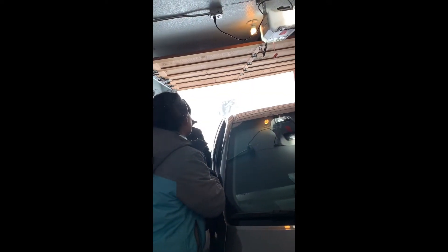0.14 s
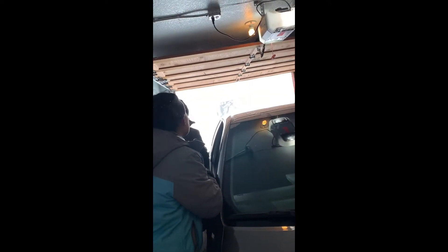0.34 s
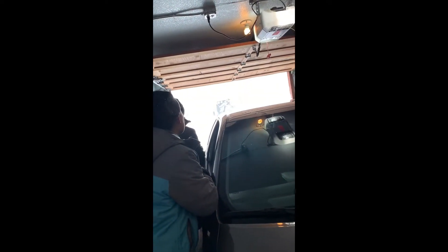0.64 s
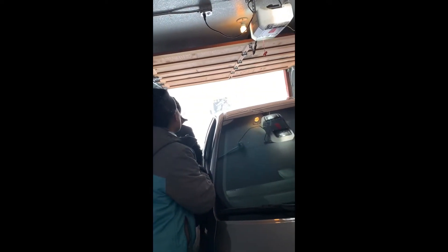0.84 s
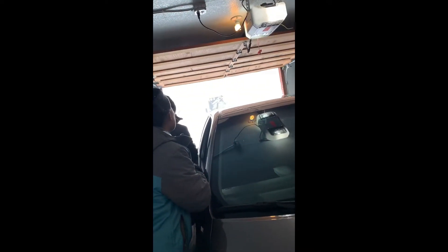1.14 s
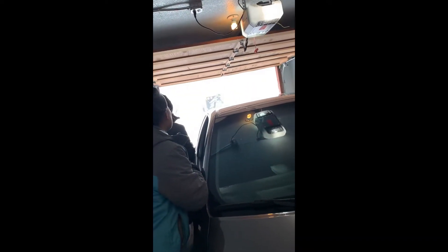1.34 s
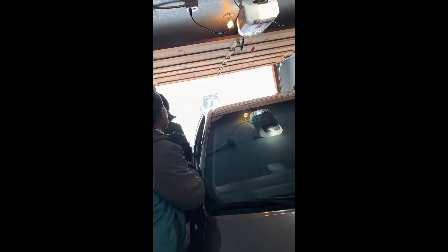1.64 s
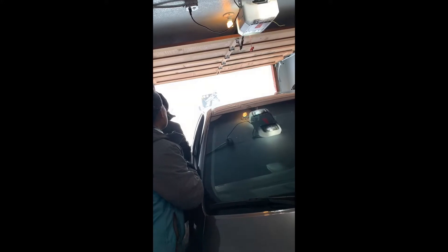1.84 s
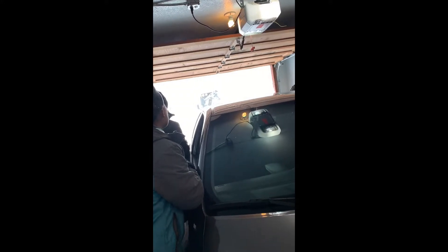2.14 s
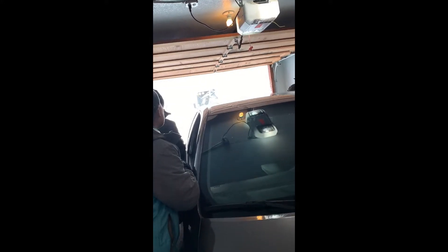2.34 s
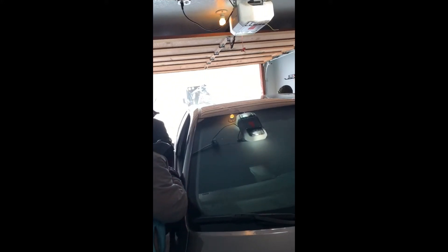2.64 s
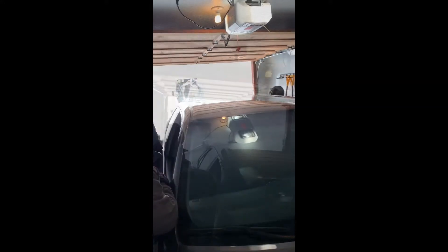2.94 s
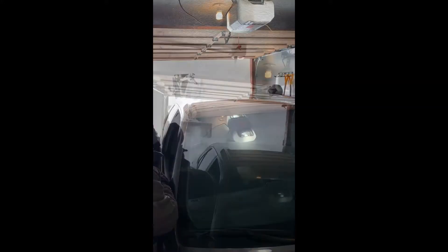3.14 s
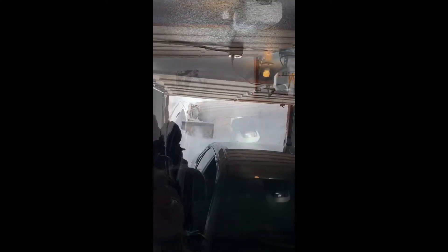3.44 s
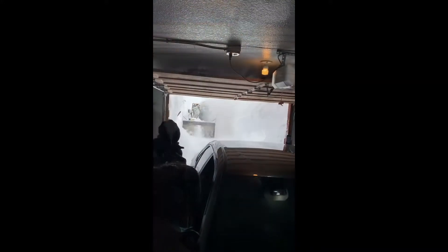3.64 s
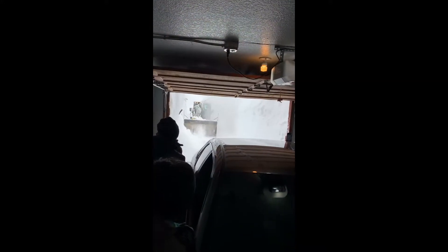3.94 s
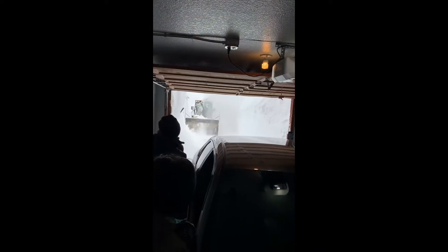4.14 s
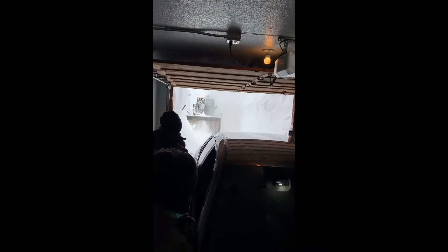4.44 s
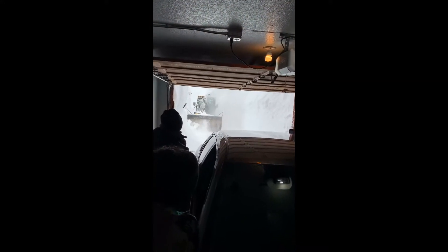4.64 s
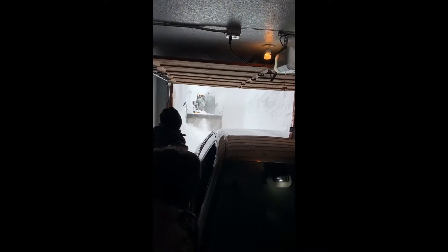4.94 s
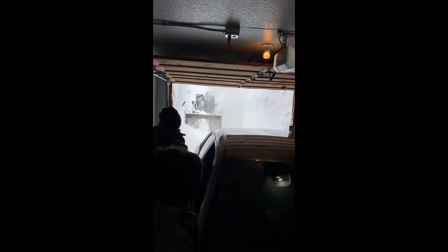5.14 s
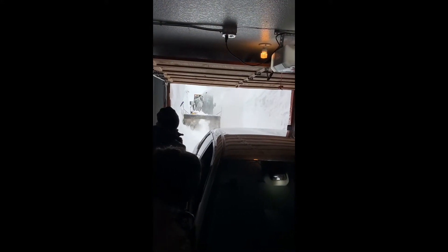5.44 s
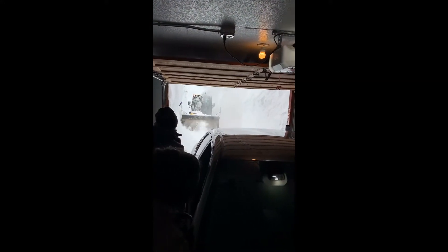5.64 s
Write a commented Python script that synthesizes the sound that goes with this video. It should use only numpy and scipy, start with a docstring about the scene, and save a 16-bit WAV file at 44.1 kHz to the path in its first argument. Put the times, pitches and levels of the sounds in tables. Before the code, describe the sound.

Inside a garage with its door open, a petrol snowblower works close outside. From 0 to 3 s it is loud and full: a low engine drone near 46 turns a second, throbbing about six times a second, with exhaust rumble, whining impeller, mechanical roar, gritty snow hiss and rattling steel. Engine pitch sags at about 0.3, 1.5 and 2.2 s, then recovers. Heavy low thumps come about every half second until 2.9 s. Thin steel squeals peak from 1.0 to 1.6 s; high chirps cluster from 2.3 to 3.2 s. A low boom grows over the first two seconds. Between 3 and 3.7 s the machine crossfades to a distant, duller, slightly higher-pitched drone. Small scuffs occur early; stronger thuds and clatters strike nearby at 4.05, 4.35, 4.65, 4.77 and 5.23 s. Low steel groans swell around 4.2, 4.8, 5.1 and 5.75 s as the drone continues to the end.

```python
"""A petrol snowblower works outside an open garage, heard from inside: first close, then, as the scene changes
around 3.2 s, from farther away. Its engine drones and throbs as a stack of tones locked to the crankshaft, and
the belt-driven impeller whines. Filtered noise makes the exhaust rumble, the mechanical roar, the hiss of snow
in the chute and the rattle of steel. The housing rings, squeals and chirps in its own modes, over a low boom
that fills the garage. A few scuffs and knocks in the garage are short bursts of grit and ringing."""
import sys
import numpy as np
from scipy import signal
from scipy.fft import rfft, irfft
from scipy.io import wavfile
from scipy.ndimage import uniform_filter1d

SR = 44100
rng = np.random.default_rng(int(sys.argv[2]) if len(sys.argv) > 2 else 0)


def put_to_file(sound):
    """Save the sound as 16-bit audio at rate SR, in the file named by the first command-line argument."""
    columns = np.atleast_2d(sound).T  # one column per channel
    safe = np.clip(columns, -1, 1)
    whole_steps = np.round(safe * 32767)
    wavfile.write(sys.argv[1], SR, whole_steps.astype(np.int16))


N = 255780
TIME, BINS = np.arange(N) / SR, np.fft.rfftfreq(N, 1 / SR)  # seconds, Hz

# How near the machine sounds. Each row: time in seconds, share of the close sound from 0 to 1.
CLOSENESS = [(0, 0.94), (2.95, 0.96), (3.2, 0.29), (3.45, 0.08), (3.7, 0), (5.8, 0.04)]
# How alike the two channels are. Each row: frequency in Hz, likeness from 0 to 1.
LIKENESS = [(60, 1), (300, 0.97), (650, 0.66), (900, 0.41), (1400, 0.97), (2000, 0.43), (2600, 0.36),
            (4000, 0.39), (5400, 1), (6300, 0.48), (8300, 1), (9600, 0.88), (11500, 1), (15000, 1)]
# How far the left channel leads the right. Each row: frequency in Hz, lead in radians.
LEFT_LEAD = [(0, 0), (1500, 0), (1950, .4), (2300, 2), (3300, 2.6), (4100, 1.3), (5000, 2.9), (5600, 3.3),
             (7700, 5.7), (9000, 6.5), (11000, 9.2), (12700, 9.6), (14000, 12), (16000, 12.6)]
# Standing waves in the garage lift or dip tones that slide across them.
# Each row: centre in Hz, width in Hz, gain at the centre in dB.
STANDING_WAVES = [(173.2, 12.7, 4.5), (228.4, 5, 7), (276.5, 7, 3), (325.3, 1.9, 3), (356.3, 5.3, 7),
                  (500.5, 3, 2), (755, 8.6, -0.5)]

# The speed that the governor holds. Each row: time in seconds, engine turns per second.
GOVERNED_SPEED = [(3.35, 46.42), (3.9, 48.5)]
# The auger bites into deep snow and drags the engine down.
# Each row: deepest moment in seconds, half length in seconds, sag in percent.
SNOW_BITES = [(.3, .19, 1.5), (1.46, .23, 4), (2.19, .21, 2.7), (3.03, .1, 1), (5.17, .15, .8)]
# After each bite the governor overshoots a little.
OVERSHOOT_PERCENT, OVERSHOOT_AFTER_S, OVERSHOOT_S = .6, .45, .14
HUNT_PERCENT, HUNT_HZ = .17, 5  # uneven firings make the speed hunt a little
TURNS_PER_THROB, FIRST_THROB_TURNS, THROB_DB = 8.13, 4.6, 2.3  # one throb in several engine turns
IMPELLER_PER_TURN, SLIP_PERCENT = .3997, .22  # the belt gears the impeller down and slips a little
# Snow passing through the machine. Each row: time in seconds, flow in dB.
SNOW_FLOW = [(0, -1), (.9, 0.1), (1.7, -0.76), (2.5, 2), (3.15, 1.04), (3.75, -2), (4.2, -1), (5.8, -0.6)]
ROAR_PER_FLOW, HISS_PER_FLOW = 0.93, 1.17  # dB per dB of flow
LABOUR_DB_PER_PERCENT = 0.03  # the exhaust rumbles harder as the engine sags

# Engine tones, before level changes and standing waves.
# Each row: multiple of the engine speed, close level in dB, far level in dB.
ENGINE_ORDERS = [(2, -26.5, -29.5), (3, -31.5, -54), (4, -28.3, -48), (5, -31, -41.5), (6, -29.8, -43),
                 (7, -38, -50), (8, -37.5, -42), (9, -46, -50), (16, -43, -51)]
# Level changes of the lowest order: it drops near 3 s and rises near the end.
# Each row: time in seconds, gain in dB.
LOWEST_ORDER_GAIN = [(0, -1.5), (.7, 0), (2.9, 0), (3.4, -2), (5.1, -2), (5.5, 4)]
# Level changes of the fifth order. Each row: time in seconds, gain in dB.
FIFTH_ORDER_GAIN = [(0, -14), (.8, -14), (1.25, 1), (1.85, -0.5), (2.3, 3), (2.8, -8), (3.2, -3)]
# Impeller tones, before snow flow and standing waves. Each row: multiple of the impeller speed (rounded
# to halves in use), close level in dB, far level in dB, roughness as a ratio, dB per dB of flow.
IMPELLER_LINES = [(4, -32.5, -62, 0.089, -1.5), (9, -37, -66, 0.07, 4), (12, -34, -38.5, 0.12, 2.5),
                  (16.5, -35.5, -45.5, 0.23, -2), (18, -36, -54, 0.3, -5), (19, -36.5, -63, 0.21, -4),
                  (27, -35.5, -41.5, 0.22, .8), (33.5, -44, -50, .25, 2.5), (40.5, -41, -50.5, 0.25, 0),
                  (47, -41, -54.5, .2, 1), (54, -49.5, -50, 0.44, 0), (71.7, -49.5, -58, 0.61, -1.5),
                  (79.1, -44.5, -53, 0.52, -2.5)]
# Exhaust noise, before trims. Each row: frequency in Hz, close level in dB per Hz, far level in dB per Hz.
EXHAUST_RUMBLE = [(15, -66, -72), (28.6, -48.5, -54), (43.3, -41.5, -38.5), (57.5, -43, -45),
                  (81.6, -38.5, -43), (103, -41, -44), (128, -45, -59), (161, -50, -55), (214, -51.5, -66),
                  (256, -53.5, -53), (300, -49, -53), (327, -48.5, -50), (405.4, -50.5, -56.5),
                  (410, -59.5, -59)]
# Mechanical roar and snow hiss, before trims.
# Each row: frequency in Hz, close level in dB per Hz, far level in dB per Hz.
ROAR_AND_HISS = [(425, -56.5, -61), (576, -61, -59), (654, -54, -55.5), (655, -57, -60), (720, -54.5, -61),
                 (800, -59, -57.5), (850, -58, -62.5), (1020, -63, -63.5), (1090, -65, -63),
                 (1210, -64.5, -65), (1650, -65, -68.5), (1790, -63.5, -66.5), (1900, -68.5, -68.5),
                 (2010, -67, -71.5), (3270, -71.5, -75), (4150, -70, -77), (4850, -70.5, -77.5),
                 (9100, -75, -80.5), (10400, -81, -81), (13600, -84, -91), (15500, -87, -95)]
# Loose steel that rattles. Each row: centre in Hz, half width in Hz, relative level in dB.
RATTLE_MODES = [(1280, 67, 2), (1500, 98, -3.5), (1604, 80, 3), (1990, 110, -12), (2500, 270, -4.5),
                (4080, 150, -18.5)]
RATTLE_DB, RATTLE_FAR_DB = -42.5, -53.5  # before snow flow
# Ringing of the steel housing and chute.
# Each row: centre in Hz, half width in Hz, close level in dB, far level in dB.
HOUSING_RINGS = [(102.8, 3.7, -34, -33), (329, 30, -38, -35.5), (1290, 53, -43.5, -44),
                 (1463, 52, -47, -49.5), (4200, 220, -74, -59), (5030, 73, -45, -70),
                 (6740, 31, -48.5, -75), (8330, 70, -49.5, -59.5), (10200, 140, -46, -74)]
# A low boom that fills the garage, before its level changes. Each row: frequency in Hz, level in dB.
GARAGE_DRONE = [(77.7, -23.8), (155.4, -38.5), (233.1, -37.5)]
# Level changes of the boom. Each row: time in seconds, gain in dB.
DRONE_GAIN = [(0, -15), (2.2, 0.5), (2.7, -2.5), (4.8, -1), (5.8, -1.5)]

# The auger rubs on the housing.
# Each row: middle in seconds, half length in seconds, mode in Hz, level at the middle in dB.
AUGER_RUBS = [(.4, .6, 6530, -47), (1.3, 1.8, 3640, -44), (.79, .1, 3640, -48), (.99, .06, 3640, -42),
              (1, .3, 3705, -44), (1.1, .12, 6767, -33.5), (1.11, .09, 3640, -34), (1.1, .06, 10143, -42),
              (1.13, .1, 8414, -39), (1.35, .13, 8250, -38), (1.36, .5, 6767, -43), (1.36, .13, 10143, -39),
              (1.49, .15, 3640, -34), (1.55, .35, 3705, -47), (1.74, .13, 3640, -45), (2, .3, 3640, -42.5),
              (2, .25, 3590, -44), (2.075, .045, 3640, -37), (2.15, .08, 6767, -43), (2.45, .3, 10143, -44),
              (.7, 1, 8414, -47), (2.5, .8, 8414, -46), (4.2, .12, 328, -30), (4.77, .22, 328, -27),
              (5.06, .15, 328, -31), (5.75, .3, 328, -31)]
# The modes in which the steel groans and squeals, in Hz.
STEEL_MODES_HZ = [328, 3590, 3640, 3705, 6530, 6767, 8250, 8414, 10143]
# Heavy thumps, about one for every three throbs. Each row: start in seconds, peak level in dB.
HEAVY_THUMPS = [(.238, -15), (.757, -15.5), (1.287, -20), (1.835, -20), (2.385, -16), (2.915, -18)]
# Low modes that a thump rings. Each row: frequency in Hz, relative level in dB.
THUMP_RINGING = [(58, -14.5), (84, -2)]
# Brief touches on the steel. Each row: start in seconds, lower mode in dB, upper mode in dB.
STEEL_CHIRPS = [(.262, -36, -40), (2.3, -41, -41), (2.35, -38, -39), (2.434, -45, -44), (2.461, -37, -34),
                (2.548, -47, -41), (2.66, -44, -46), (2.722, -41, -38), (2.785, -46, -50),
                (2.808, -33, -33.5), (3.022, -39, -35), (3.1, -51, -40), (3.25, -41, -43),
                (4.906, -37.5, -55), (4.934, -43, -55), (4.995, -39, -55), (5.015, -44, -52),
                (5.703, -48, -51), (5.765, -48, -49)]
# The two modes of a chirp. Each row: centre in Hz, half width in Hz.
CHIRP_RINGING = [(8350, 180), (10143, 44)]

# What a knock or scuff sets ringing, from low to high.
# Each row: centre in Hz, half width in Hz (unused in a knock's thud), relative level in dB.
THUD_MODES = [(208, 14, 3), (255, 20, -1), (300, 28, -7), (350, 47, -6)]
CLATTER_MODES = [(710, 330, 5.5), (1080, 29, -9), (1330, 130, 0.5), (1682, 25, 8), (2550, 1400, -6.5)]
SCRAPE_MODES = [(4400, 2000, -1.1), (8260, 1200, -1.8), (10400, 240, -1.2)]
# Rough contacts. Each row: start in seconds, length in seconds, thud in dB, clatter in dB, scrape in dB.
ROUGH_SCUFFS = [(0.784, 0.042, -19, -28, -35), (0.969, 0.034, -19, -30, -33),
                (2.052, 0.03, -27, -20.5, -47), (2.797, 0.014, -22, -26, -41), (4.029, 0.1, -22, -31, -43),
                (4.079, 0.11, -24, -33, -57), (4.36, 0.091, -31, -27.5, -38.5),
                (4.62, 0.023, -40, -26.5, -42), (4.755, 0.043, -27, -27.5, -38),
                (5.22, 0.085, -26, -50, -55)]
# Hard blows. Each row: start in seconds, thud in dB, clatter in dB, scrape in dB.
HARD_KNOCKS = [(4.027, -30, -36, -38), (4.058, -10.5, -30, -44), (4.073, -9.5, -33, -40),
               (4.321, -35, -31, -36), (4.366, -23, -26, -38), (4.38, -20, -26, -36), (4.54, -40, -44, -43),
               (4.629, -28, -26, -33.5), (4.654, -32, -30, -44), (4.684, -34, -31, -46),
               (4.757, -17, -22.5, -37), (4.77, -24, -26, -37), (4.814, -32, -40, -41),
               (5.235, -17, -36, -48)]


def amp(db):
    """Decibels to gain."""
    return 10 ** (np.asarray(db) / 20)


def evened(x):
    """Scales to rms 1."""
    return x / np.sqrt(np.mean(x ** 2) + 1e-20)


def curves(rows):
    """Each column of a table, joined by straight lines in time."""
    s, *columns = np.transpose(rows)
    return [np.interp(TIME, s, c) for c in columns]


def spectra(rows):
    """Each column of a table, joined by straight lines over log frequency."""
    hz, *columns = np.transpose(rows)
    return [np.interp(np.log(BINS + 1), np.log(hz + 1), c) for c in columns]


def wander(rate_hz):
    """Slow random drift of rms 1."""
    return evened(irfft(rfft(rng.standard_normal(N)) / (1 + (BINS / rate_hz) ** 2), N))


def below(edge_hz):
    """Gain of a steep low-pass."""
    return 1 / np.sqrt(1 + (BINS / edge_hz) ** 10)


def above(edge_hz):
    """Gain of the matching high-pass."""
    return np.sqrt(1 - below(edge_hz) ** 2)


def resonance(hz, half_width_hz):
    """Gain of a resonance, down to half at the half width on each side."""
    return 1 / (1 + ((BINS - hz) / half_width_hz) ** 2)


def noise():
    """Two unrelated white noises."""
    return rng.standard_normal((2, N))


def grit(per_s=900, spread_db=6.0, share=0.19):
    """Hiss mixed with separate random grains, like ice hitting the chute."""
    grain_db = spread_db * np.minimum(rng.exponential(1, N), 5)
    grains = amp(grain_db) * (rng.random(N) < per_s / SR)
    return evened(noise() + share * evened(grains * noise()))


def stereo(gain, pair):
    """Colours two unrelated signals and blends them into a left and a later, partly alike right channel."""
    a, b = rfft(pair) * gain
    same = np.clip(spectra(LIKENESS)[0], 0, 1)
    lag = np.exp(-1j * np.interp(BINS, *np.transpose(LEFT_LEAD)))
    right = lag * (same * a + np.sqrt(1 - same ** 2) * b)
    return irfft(np.array([a, right]), N)


def closeness():
    """Share of the close sound over time."""
    return np.clip(curves(CLOSENESS)[0], 0, 1)


def distance(close_db, far_db):
    """Gain that passes between its close and its far value."""
    close = closeness()
    return np.sqrt(close * amp(close_db) ** 2 + (1 - close) * amp(far_db) ** 2)


def wash(table, band, drive):
    """Noise with the close spectrum giving way to the far one."""
    close = closeness()
    near, far = (stereo(band * amp(db) * np.sqrt(SR / 2), drive()) for db in spectra(table))
    return np.sqrt(close) * near + np.sqrt(1 - close) * far


def tone(turns, rough, flutter_hz):
    """A tone of rms 1 from a random starting phase, whose strength and phase flutter."""
    flutter = 1 + rough * (wander(flutter_hz) + 1j * wander(flutter_hz))
    return evened((flutter * np.exp(2j * np.pi * (turns + rng.random()))).real)


def standing(turns):
    """Gain that the garage's standing waves give a tone as its pitch moves."""
    line_hz = np.gradient(turns) * SR
    return amp(sum(db / (1 + (2 * (line_hz - hz) / width_hz) ** 2) for hz, width_hz, db in STANDING_WAVES))


def patches(x, patchy_db=3.0, span_s=.11, span_hz=60):
    """The garage's echoes favour narrow bands that come and go."""
    window, hop = 2048, 512  # samples
    z = signal.stft(x, nperseg=window, noverlap=window - hop)[2]
    field = rng.standard_normal(z.shape[1:])
    # smooth the random field over frequency, then over time
    for axis, steps in enumerate((span_hz * window / SR, span_s * SR / hop)):
        field = uniform_filter1d(field, max(1, round(steps)), axis=axis)
    gain = evened(amp(patchy_db * evened(field)))
    return signal.istft(z * gain, nperseg=window, noverlap=window - hop)[1][:, :N]


def envelopes(s, rise, hold, t60):
    """Attack, hold and release in seconds from each start time; t60 is the time to fall by 60 dB."""
    age = TIME - s[:, None]
    return np.clip(age / rise, 0, 1) * amp(-60 * np.clip(age - hold, 0, 2 * t60) / t60)


def contacts(shape, levels, families):
    """Gritty noise in each family of modes, under one envelope for each contact."""
    out = np.zeros((2, N))
    for level_db, modes in zip(levels, families):
        colour = sum(amp(db) * resonance(hz, half_width_hz) for hz, half_width_hz, db in modes)
        grains = stereo(colour * below(13000), grit(per_s=2000, spread_db=6.0, share=0.42))
        out += (amp(level_db) @ shape) * evened(grains)
    return out


def struck(s, db, ring):
    """Starts one ring, scaled to its peak, at each blow."""
    blows = np.bincount(np.round(s * SR).astype(int), amp(db), N)
    return signal.oaconvolve(blows, ring / abs(ring).max())[:N]


def sag():
    """Percent by which the engine runs slow: it dips at each bite, then overshoots."""
    total = 0
    for s, length, depth in SNOW_BITES:
        dip = depth * np.exp(-((TIME - s) / length) ** 2)
        rebound = OVERSHOOT_PERCENT * np.exp(-((TIME - s - OVERSHOOT_AFTER_S) / OVERSHOOT_S) ** 2)
        total = total + dip - rebound
    return total


def engine(turns, throb, throb_depth=0.46):
    """Tones at multiples of the engine speed; the two lowest swell with each throb."""
    lag = np.exp(-2j * np.pi * throb)
    # turning backwards, the swell adds tones just under the lowest order
    swell = .6 + lag + .16 * lag ** 2 + .04 * (wander(5) + 1j * wander(5))
    out = distance(-20.3, -34) * evened((swell * np.exp(2j * np.pi * turns)).real)
    out *= amp(curves(LOWEST_ORDER_GAIN)[0])
    for multiple, close_db, far_db in ENGINE_ORDERS:
        phase = multiple * turns
        line = tone(phase, rough=0.13, flutter_hz=4.5) * standing(phase)
        if multiple == 5:
            line = line * amp(curves(FIFTH_ORDER_GAIN)[0])
        if multiple == 2:
            line = line * (1 + throb_depth * lag.real * closeness())
        out += distance(close_db, far_db) * line
    return out


def impeller(turns, flutter_hz=4.5, echo=0.25):
    """The impeller whines in tones that follow the snow flow, and echoes blur them on each side."""
    out = np.zeros((2, N))
    flow_db = curves(SNOW_FLOW)[0]
    for multiple, close_db, far_db, rough, per_flow in IMPELLER_LINES:
        phase = round(2 * multiple) / 2 * turns
        direct = tone(phase, rough=rough, flutter_hz=flutter_hz)
        echoes = np.array([tone(phase, rough=2.8, flutter_hz=19.0) for side in "LR"])
        level = distance(close_db, far_db) * amp(per_flow * flow_db) * standing(phase)
        out += level * (direct + echo * echoes)
    return out


def machine_noise(turns, throb):
    """Exhaust rumble, mechanical roar and snow hiss, pulsing with the engine; roar and hiss also surge."""
    flow_db = curves(SNOW_FLOW)[0]
    rumble_db = LABOUR_DB_PER_PERCENT * sag()
    roar_db, hiss_db = ROAR_PER_FLOW * flow_db, HISS_PER_FLOW * flow_db
    firing, surge = np.cos(2 * np.pi * turns), wander(16.7)
    beat = np.cos(2 * np.pi * throb) * closeness()

    boom = wash(EXHAUST_RUMBLE, below(154), noise)
    boom = boom * amp(rumble_db + THROB_DB * beat) * distance(-3.1, -0.92)
    rumble = wash(EXHAUST_RUMBLE, above(137) * below(500), noise)
    rumble = rumble * amp(rumble_db + 0.44 * firing - 1)
    rumble = rumble * amp([[-.5], [.5]])  # a little stronger on the right
    roar = wash(ROAR_AND_HISS, above(473) * below(2960), noise)
    roar = roar * amp(roar_db + 0.14 * firing + 1.07 * surge + .5 * wander(32) - 0.9)
    hiss = wash(ROAR_AND_HISS, above(2160), grit)
    hiss = hiss * amp(hiss_db + 0.5 * firing + 1.1 * surge + 0.5 * wander(45) - 1.0)
    return boom + rumble + patches(roar + hiss)


def rattle(turns, uneven_db=4.5, decay_turns=.15):
    """Each firing shakes loose steel, some harder than others."""
    firing = turns.astype(int)
    strength = amp(uneven_db * np.clip(rng.standard_normal(firing[-1] + 1), -2, 2))[firing]
    colour = sum(amp(db) * resonance(hz, half_width_hz) for hz, half_width_hz, db in RATTLE_MODES)
    shaken = stereo(colour, noise() * strength * np.exp(-(turns % 1) / decay_turns))
    return distance(RATTLE_DB, RATTLE_FAR_DB) * amp(curves(SNOW_FLOW)[0]) * evened(shaken)


def housing():
    """Steel rings under the scraping auger: noise in narrow bands that flicker in level."""
    out = np.zeros((2, N))
    for hz, half_width_hz, close_db, far_db in HOUSING_RINGS:
        ring = stereo(resonance(hz, half_width_hz), noise()) * amp(3.0 * wander(6.2))
        out += distance(close_db, far_db) * evened(ring)
    return out


def drone():
    """A boom of fixed pitch that grows over the first two seconds, then dips a little."""
    level = amp(curves(DRONE_GAIN)[0])
    return level * sum(amp(db) * tone(hz * TIME, rough=0.099, flutter_hz=2.6) for hz, db in GARAGE_DRONE)


def squeals(catch_db=4.5, blur=0.04, waver_percent=.1):
    """Each rub sets one mode of the steel groaning or squealing, its pitch wavering with the pressure."""
    s, length, mode_hz, db = np.transpose(AUGER_RUBS)
    swells = np.cos(np.pi / 2 * np.clip((TIME - s[:, None]) / length[:, None], -1, 1)) ** 4
    mode = np.argmin(abs(mode_hz[:, None] - STEEL_MODES_HZ), axis=1)
    grip = evened(amp(catch_db * wander(40)))  # the rubbing catches and slips
    out = np.zeros((2, N))
    for index, hz in enumerate(STEEL_MODES_HZ):
        rub = (amp(db) * (mode == index)) @ swells
        pitch_hz = hz * (1 + waver_percent / 100 * wander(13.4))
        phase = 2 * np.pi * np.cumsum(pitch_hz) / SR + blur * np.cumsum(rng.standard_normal(N))
        lead = np.interp(hz, *np.transpose(LEFT_LEAD))
        out += rub * grip * np.sqrt(2) * np.cos([phase, phase - lead])
    return out


def thumps(rise_s=0.0089, t60=0.13):
    """A heavy beat swells quickly and dies away in the low modes."""
    s, db = np.transpose(HEAVY_THUMPS)
    age = TIME[:SR // 2]
    ring = sum(amp(level) * np.sin(2 * np.pi * hz * age) for hz, level in THUMP_RINGING)
    ring = ring * np.minimum(age / rise_s, 1) * amp(-60 * age / t60)
    return struck(s, db, ring)


def chirps():
    """Each brief touch rings two high modes of the housing."""
    s, *levels = np.transpose(STEEL_CHIRPS)
    shape = envelopes(s, rise=0.0026, hold=0.0056, t60=0.083)
    out = np.zeros((2, N))
    for db, (hz, half_width_hz) in zip(levels, CHIRP_RINGING):
        out += (amp(db) @ shape) * evened(stereo(resonance(hz, half_width_hz), noise()))
    return out


def scuffs():
    """Short rough contacts, each dying away in the garage."""
    s, length, *levels = np.transpose(ROUGH_SCUFFS)
    shape = envelopes(s, rise=0.016, hold=0.45 * length[:, None], t60=0.12)
    return contacts(shape, levels, (THUD_MODES, CLATTER_MODES, SCRAPE_MODES))


def knocks(thud_t60=.04):
    """A hard blow rings the low modes at once, with a sharp crack on top."""
    s, thud_db, *levels = np.transpose(HARD_KNOCKS)
    age = TIME[:SR // 4]
    ring = sum(amp(db - 60 * age / thud_t60) * np.sin(2 * np.pi * hz * age) for hz, _, db in THUD_MODES)
    shape = envelopes(s, rise=0.0012, hold=0.0027, t60=0.059)
    return struck(s, thud_db, ring) + contacts(shape, levels, (CLATTER_MODES, SCRAPE_MODES))


def scene():
    """The crankshaft sets the pace of engine, impeller, throb and rattle; the other sounds are added."""
    speed = curves(GOVERNED_SPEED)[0] * (1 + (HUNT_PERCENT * wander(HUNT_HZ) - sag()) / 100)
    crank = np.cumsum(speed) / SR  # turns so far
    shaft = IMPELLER_PER_TURN * np.cumsum(speed * (1 + SLIP_PERCENT / 100 * wander(3))) / SR
    throb = (crank - FIRST_THROB_TURNS) / TURNS_PER_THROB
    machine = engine(crank, throb) + impeller(shaft) + machine_noise(crank, throb) + rattle(crank)
    steel = housing() + squeals() + thumps() + chirps()
    return machine + drone() + steel + scuffs() + knocks()


def record(dry):
    """Rounds off the highest peaks and cuts the treble above 15900 Hz."""
    rounded = dry / (1 + (dry / .76) ** 8) ** (1 / 8)
    low_pass = signal.firwin(511, 15900, window=("kaiser", 9), fs=SR)
    return signal.oaconvolve(rounded, low_pass[None], "same")


dry = scene()
out = record(dry)
put_to_file(out)
```